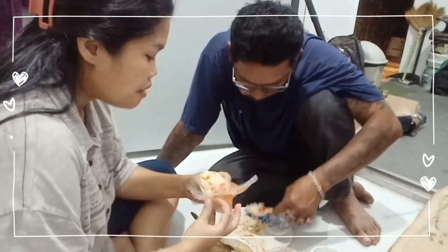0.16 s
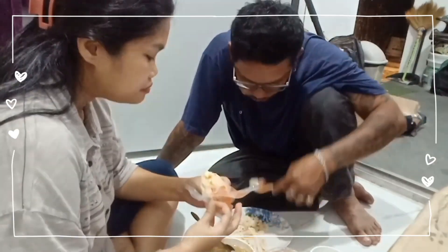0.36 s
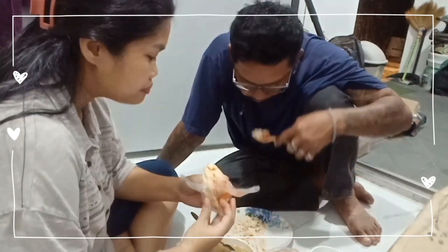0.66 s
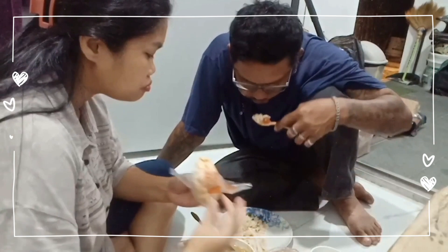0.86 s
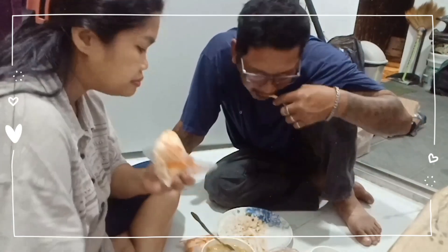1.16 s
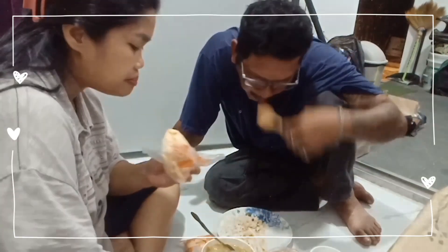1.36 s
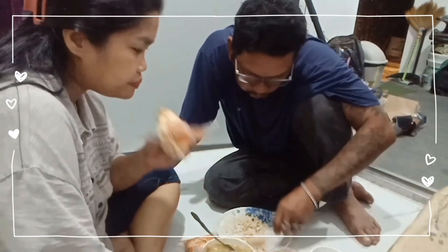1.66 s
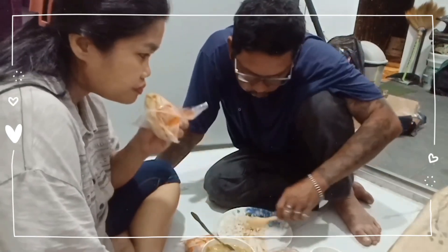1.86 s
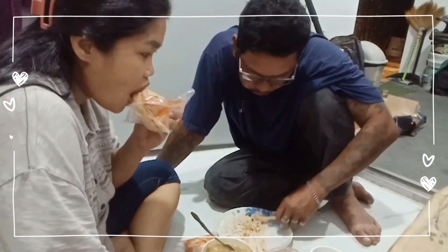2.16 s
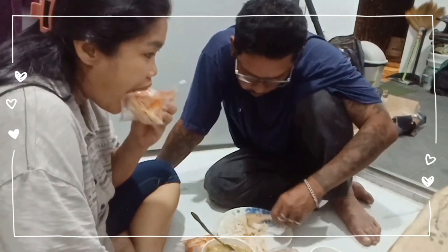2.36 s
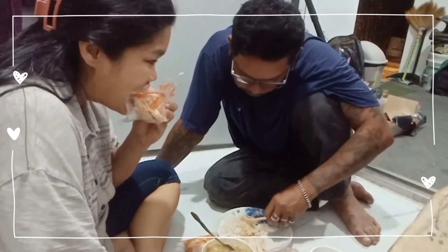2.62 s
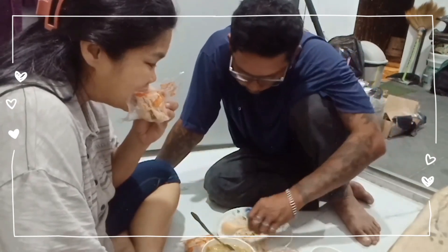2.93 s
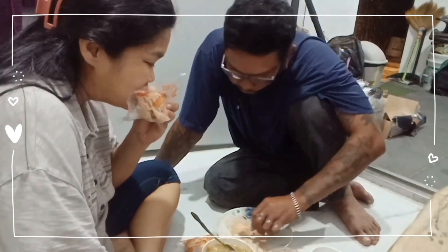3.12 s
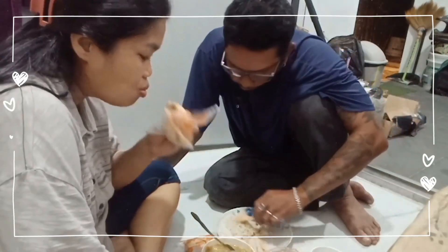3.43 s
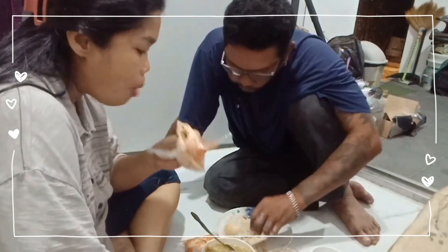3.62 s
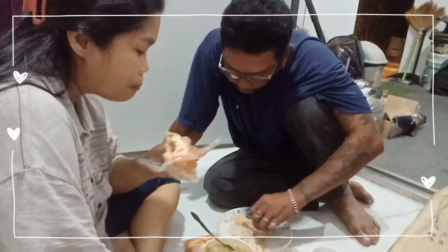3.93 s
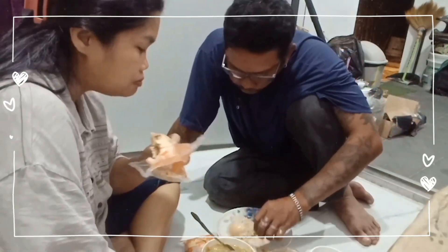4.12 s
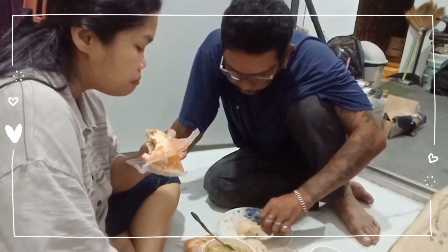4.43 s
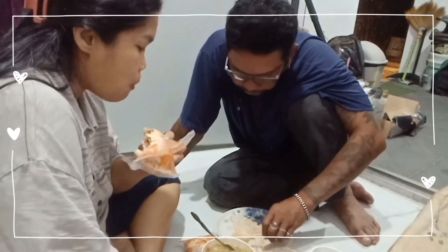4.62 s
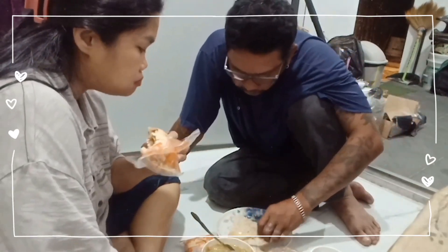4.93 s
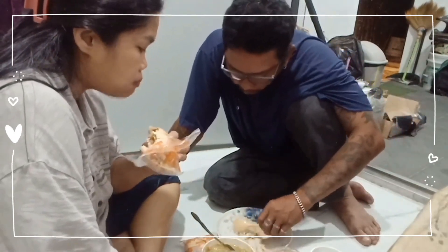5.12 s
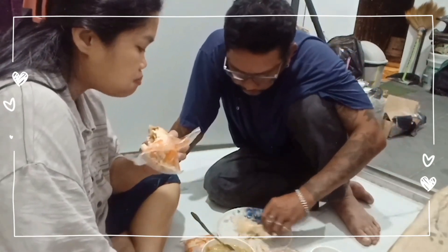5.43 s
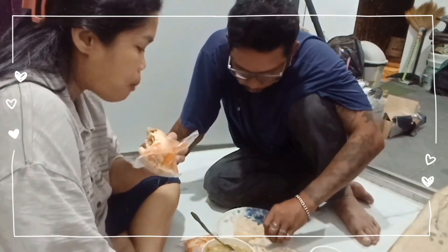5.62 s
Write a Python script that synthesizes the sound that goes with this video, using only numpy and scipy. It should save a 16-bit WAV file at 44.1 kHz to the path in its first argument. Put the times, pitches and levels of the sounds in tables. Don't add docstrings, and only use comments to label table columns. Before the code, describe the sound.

Paper wrapping crackles in the hands, then a metal spoon clinks, scrapes and briefly squeaks on a ceramic plate in a small hard room.

```python
import sys
import numpy as np
from scipy import signal
from scipy.fft import rfft, irfft
from scipy.io import wavfile
from scipy.ndimage import uniform_filter1d

SR = 44100
rng = np.random.default_rng(int(sys.argv[2]) if len(sys.argv) > 2 else 0)


def gain_from_db(level_db):
    decades = np.asarray(level_db, float) / 20
    return 10 ** decades


def master_out(mix):
    frames = np.transpose(np.atleast_2d(mix))
    ceiling = np.clip(frames, -1, 1)
    pcm = np.round(ceiling * 32767).astype(np.int16)
    wavfile.write(sys.argv[1], SR, pcm)


N = 254898
T = np.arange(N) / SR


def taps(tracks):
    # start_s, peak_db, knock_db, bright_db, room_db
    blows = [(1.8087, -34.5, 7, -23, -15), (1.8137, -35, -16, -23, -18), (2.2766, -42, -21, -7, 1),
             (2.293, -19.5, -10, -0.5, -4.5), (2.3153, -35.5, -9, -36, -2), (2.678, -21, -6, 2, -9),
             (2.688, -30.5, -13, -12, -25), (2.7296, -31, -10, -12, 1), (2.7472, -35, -11, 13, 0),
             (3.8731, -37, -3, -27, 0), (3.8836, -41, 11, -40, -6), (4.3193, -40, -25, -19, -0.5),
             (4.4087, -29, -17, -11.5, -14), (4.847, -11.5, -3, -7, -4), (4.8585, -24, -2, -12, -1.5),
             (4.87, -25, -11, -32, -4), (4.8802, -29, -9, -25, -2), (5.1237, -28.5, -13, -15, -14),
             (5.1255, -17, -16, -25, -9.5), (5.136, -24, 1, -34.5, -10.5)]
    bounce = [
        (5.5012, -15, -11, -8.5, -8),
        (5.5027, -7.5, -14, -15.5, -8),
        (5.5043, -6, -19, -27, -10),
    ]
    # [(pitch_hz, width_hz, level_db)]
    struck = [
        (0, [(802, 74, -14), (1380, 42, 0), (1810, 29, -6), (3160, 26, -8), (3220, 15, -7), (4680, 31, -19), (5400, 40, -16), (5490, 15, -31)]),
        (2.2, [(1560, 160, -13), (2280, 22, -6), (2730, 26, -11), (3150, 37, 7), (3800, 170, -4), (4640, 130, 1), (5240, 170, -1), (6200, 64, -2), (7800, 30, -14), (8800, 26, -11), (8750, 18, 0), (9300, 38, -19)]),
        (2.6, [(1150, 43, -9), (1710, 42, -7), (1960, 45, 0), (2280, 38, 2), (3320, 26, -21), (3940, 61, -7), (4470, 54, 7), (6060, 40, 2), (7900, 77, -22), (8300, 25, -11), (8550, 65, -9), (9200, 100, -21)]),
        (2.72, [(1380, 23, -6), (1970, 43, -9), (2660, 89, 0), (2980, 31, -4), (3400, 110, -21), (3820, 27, 4), (4300, 260, 8), (5100, 22, -1), (6200, 63, -17), (8500, 47, -4), (8680, 53, -11), (9420, 290, -15)]),
        (3.8, [(1217, 31, -2), (1400, 57, 3.5), (1920, 27, 3), (2690, 57, -3), (2900, 31, -15), (3480, 59, -2), (4590, 60, -28)]),
        (4.3, [(2410, 130, 2), (4670, 170, -7)]),
    ]
    struck_later = [
        (4.39, [(2350, 26, -10), (2660, 31, 0), (3180, 50, -2), (3920, 23, 5), (4330, 42, 7), (4620, 28, 11), (5100, 74, -13), (5800, 130, -20), (7970, 42, -19)]),
        (4.8, [(1208, 26, -1.5), (1440, 15, 6), (1870, 82, 1), (2460, 32, 0), (2715, 37, -4), (2840, 22, 1.5), (3030, 34, -8), (3830, 38, -17), (4100, 46, -7), (4700, 53, -17), (5130, 81, -7), (6070, 22, -13), (7900, 150, -18), (8090, 39, -19)]),
        (5.1, [(1060, 57, -13), (1660, 27, -4.5), (2496, 53, 2), (2790, 85, 1), (3340, 41, -11), (3760, 27, 0), (3890, 37, -0.5), (4300, 16, -18), (4720, 82, -16), (5160, 19, -12), (6000, 21, -21), (6900, 35, -14), (8350, 120, -17), (8900, 25, -20)]),
        (5.4, [(1390, 62, -12), (1655, 32, -0.5), (2024, 68, -3), (2410, 30, 2), (2920, 220, 4.5), (3420, 65, -22), (3740, 33, -11), (4200, 18, -14), (4200, 67, -14), (4600, 41, -8), (5100, 28, -24), (6350, 85, -25.5), (7300, 71, -21), (8060, 98, -22)]),
    ]
    for s, db, knock_db, bright_db, room_db in blows + bounce:
        blow = contact(T[:4096], 0.00045, 0.2, 0.0034)
        body = [table for start, table in struck + struck_later if start <= s][-1]
        crack = level(ring(ring(blow, 3290, 3200), 2700, 3500), -0.97)
        knock = level(ring(ring(blow, 1670, 1400), 730, 1600), knock_db + 0.5)
        tick = level(ring(ring(blow, 8930, 2300), 9000, 6200), bright_db + 1.5)
        sound = crack + knock + tick + level(modes(blow, body, 1.63), 1.9)
        add(tracks, s, to_peak(sound, db), room_db)


def spoon_ring(squeaked, struck):
    # pitch_hz, width_hz, level_db
    spoon = [(1335, 45, -10), (2620, 45, -9.5), (2890, 70, -4), (2690, 56, -13.5), (2760, 8, 2),
             (3870, 13, -0.5), (5290, 28, -13.5), (8370, 23, -7)]
    return gain_from_db(-3.0) * modes(squeaked, spoon, 0.55) + gain_from_db(15.0) * modes(struck, spoon[6:], 0.92)


def squeaks(tracks):
    # start_s, hold_s, slip_rate_hz, glide_hz_per_s, level_db
    slips = [
        (3.2482, 0.021, 1289, 5000.5, -20),
        (3.297, 0.013, 1344, -500, -24),
        (4.4967, 0.01, 1277, 1498, -43),
        (4.5117, 0.002, 1330, 502, -21.5),
        (5.177, 0.007, 1400, -2000, -39),
        (5.193, 0.008, 1335, 1000, -37.5),
    ]
    # first_multiple_db, fall_per_multiple_db, odd_multiples_db, rasp_db, room_db
    angles = [(-14, 5, -7.5, -13.5, -7), (-25, 17, -18, -21, -18), (6, 9.5, 12, -14, -0.5),
              (-5.5, 15, -4.5, -18, -8.5), (0, 16, -12, -6, -5), (-5.5, 15, -4.5, -8, -9)]
    rise_s, fall_s, edge_db = 0.0062, 0.0021, -13.5
    octave_db, rough_db = -0.5, 2.5
    for (s, hold, hz, glide, db), (first_db, fall_db, odd_db, rasp_db, room_db) in zip(slips, angles):
        knots = np.cumsum([0, rise_s, abs(hold), fall_s])
        t = np.arange(0, knots[-1], 1 / SR)
        noise = rng.standard_normal((2, 8192))[:, :len(t)]
        wobble = 1 + 0.069 * uniform_filter1d(noise[0], 40)
        phase = 2 * np.pi * np.cumsum((hz + glide * t) * wobble) / SR
        ease_db = np.interp(t, knots, [edge_db, 0, 0, edge_db])
        k = np.arange(1, 9)
        multiples_db = np.where(k == 1, first_db, octave_db - fall_db * (k - 2) + odd_db * (k % 2))
        flutter = uniform_filter1d(rng.standard_normal((8, 8192)), 30)[:, :len(t)] * 3.1 * rough_db
        tones = []
        for j, tone_db in zip(k, multiples_db):
            tones.append(gain_from_db(tone_db + (j != 2) * flutter[j - 1]) * np.sin(j * phase))
        tones[1] = tones[1] * gain_from_db(0.45 * ease_db)
        puffs = noise[1] * (1 + np.cos(phase))
        rasp = level(ring(ring(puffs, 3800, 3200), 4100, 4600), rasp_db)
        add(tracks, s, (1.65 * sum(tones) + rasp) * gain_from_db(db + ease_db), room_db)


def scrapes():
    # firmest_s, swell_s, ease_s, level_db, bright_db
    drags = [
        (3.242, 0.042, .003, -43.5, -7),
        (3.995, 0.038, 0.12, -51.5, -3),
        (4.06, 0.17, 0.046, -51.5, -8),
        (4.326, 0.0039, 0.054, -53.5, -27),
        (4.42, .005, 0.093, -46, -12),
        (4.49, 0.059, .003, -47, -10),
        (4.525, 0.033, 0.086, -39.5, -32),
        (4.846, 0.0069, .005, -38, -5),
        (5.151, .004, 0.088, -53, 2),
        (5.215, 0.098, 0.11, -35, -18),
    ]
    slides = [
        (1.89, 0.15, 0.099, -48, -9),
    ]
    # pitch_hz, width_hz, level_db
    middle = [(2646, 51, -7.5), (3300, 96, -4), (3787, 24, 1.5), (3990, 120, -5), (4580, 68, -4),
              (5390, 33.6, -2.5), (5900, 300, -31), (7340, 100, -14.5), (7950, 37, -22)]
    rim = [(2790, 20, -2), (3150, 77, -9), (4280, 83, -11), (6140, 84, -15), (8000, 75, -20)]
    grit = grains(5000, 3.6)
    drag = friction(drags, grit, lambda x: plate(x, middle), 2.7)
    slide = friction(slides, grit, lambda x: plate(x, rim), 4.2)
    return drag + slide + catches(grit)


def plate(x, table):
    return level(modes(x, table, 2.0), 0) + level(ring(x, 2400, 2700), -3.0)


def catches(grit):
    # firmest_s, swell_s, ease_s, level_db, pitch_hz
    notes_sung = [
        (1.6, 0.052, 0.044, -59, 4190),
        (2.525, 0.0091, 0.022, -43, 1550),
        (3.208, 0.0084, .055, -47, 3840),
        (4.377, 0.0092, 0.021, -42.5, 1610),
        (4.472, .017, .03, -51, 4700),
    ]
    total = 0
    for *stroke, hz in notes_sung:
        tone = level(ring(ring(grit, hz, 150), hz, 260), 0)
        total = total + tone * strokes([(*stroke, -40)])[0]
    return total


def creases(tracks):
    # start_s, peak_db, ring_hz, thin_db
    folds = [(0.077, -42, 5340, -8), (0.184, -47, 3820, -7), (0.2039, -38.5, 3990, -7.5),
             (0.388, -37.5, 5740, 5), (0.407, -30.5, 4000, -1), (0.454, -40, 3470, 9),
             (0.4794, -35, 5330, 12), (0.601, -37, 5340, -11), (0.613, -42.5, 3320, -20),
             (0.7045, -41.5, 3460, -18), (0.7395, -38, 3720, -4), (0.7946, -46, 5560, -19),
             (0.809, -38.5, 4240, -18), (0.84, -38, 4120, -10), (0.863, -36.5, 4000, 9),
             (0.9424, -43.5, 2550, -21), (1.011, -43, 4450, -14), (1.0234, -40, 4940, -3),
             (1.07, -47.5, 3980, -16), (1.132, -38, 3930, -27), (1.152, -41, 3300, -19),
             (1.158, -39, 4360, -22), (1.171, -52, 3360, 6), (1.453, -43.5, 3870, -13),
             (1.4673, -38, 5290, -31), (1.4832, -37, 3660, -4.5),
             (2.672, -43, 4600, -12), (2.8428, -26, 3130, -13.5), (2.8565, -43, 3300, -10),
                (2.8606, -30, 6000, 4), (2.864, -18.5, 5570, -4), (2.886, -38, 3100, -24),
                (2.9438, -35, 2900, -7), (2.972, -34, 2950, -11), (2.997, -42.5, 3550, -28),
                (3.0348, -42.5, 3460, 6), (3.118, -45, 4540, 6), (3.1254, -36, 4230, -11.5),
                (3.2052, -37, 4200, -13.5), (3.4163, -31, 4050, -12.5), (3.505, -52, 3335, -4),
                (3.6602, -44, 3540, -8.5), (4.4698, -35.5, 4580, -6), (4.6154, -48, 2920, -4)]
    for s, db, hz, thin_db in folds:
        thin_hz = 8940 * (1 + 0.066 * rng.standard_normal())
        snap = contact(T[:2048], 0.00057, 0.31, 0.0034)
        low = level(ring(ring(snap, hz, hz / 6), hz, hz / 1.6), 1.3)
        broad = level(ring(ring(snap, 1.34 * hz, hz), 1.15 * hz, 0.73 * hz), -5.0 + 0.41 * (thin_db + 2.5))
        thin = level(ring(ring(snap, thin_hz, thin_hz / 7), thin_hz, thin_hz / 0.76), thin_db - 2.5)
        air = level(ring(ring(snap, 9700, 7000), 7700, 9000), thin_db + 12.0)
        room_db = -4 - 0.5 * (db + 42.5)
        add(tracks, s, to_peak(low + broad + thin + air, db), room_db)


def rustle():
    # firmest_s, swell_s, ease_s, level_db, bright_db
    rubs = [
        (0.98, 3.0, 0.37, -66, -26),
        (.41, 0.035, 0.11, -60, -7),
        (.62, .03, 0.05, -66, -13),
        (.73, 0.054, 0.063, -59, -15),
        (.83, 0.054, 0.048, -53, -17),
        (1.16, 0.085, 0.053, -46.5, -32),
        (1.485, 0.069, 0.063, -49.5, -7),
        (2.92, 2.7, .53, -61.5, -16),
        (3.44, 0.022, 0.38, -62.5, -28),
        (3.79, 0.35, 0.023, -69, 0),
    ]
    return friction(rubs, grains(2200, 2.6), lambda x: ring(x, 4000, 4990), 4.0)


def bumps():
    # start_s, peak_db, pitch_hz
    pushes = [
        (1.489, -45.5, 616),
        (1.718, -46.5, 326),
        (2.31, -51, 532),
        (2.44, -54, 293),
        (2.715, -49.5, 242),
        (3.251, -50.5, 270),
        (4.787, -52, 320),
        (5.209, -52.5, 602),
        (5.622, -48.5, 302),
    ]
    out, t = np.zeros((2, N)), T[:8192]
    for s, db, hz in pushes:
        push = rng.standard_normal(len(t)) * t * np.exp(-t / 0.013)
        sound = ring(ring(push, hz, 56), hz, 65)
        add(out, s - 0.01, to_peak(sound, db - 0.5), 0)
    return out[0]


def room(x):
    # delay_s, level_db
    echoes = [
        (.0045, -25.5),
        (0.0105, -8.5),
        (0.02, -28),
        (.031, -12),
    ]
    # band_hz, t60_s
    fades = [(1000, 0.19), (3000, 0.2), (5500, 0.096), (8600, 0.17), (12000, 0.25)]
    t = T[:16384]
    tail = 0
    for hz, t60 in fades:
        band = level(ring(rng.standard_normal(len(t)), hz, 0.69 * hz), 0)
        tail = tail + band * gain_from_db(-60 * t / t60 + 8.6 * walk(104.0)[:len(t)])
    tail = 0.023 * tail * np.clip(t / 0.0055, 0, 1) ** 2
    spectrum = rfft(tail, 2 * len(t))
    power = np.abs(spectrum) ** 2
    even = np.sqrt(uniform_filter1d(power, size=900) / uniform_filter1d(power, size=60))
    tail = irfft(spectrum * even)[:len(t)]
    for s, db in echoes:
        tail[int(s * SR)] += gain_from_db(db)
    return signal.fftconvolve(x, tail)[:N]


def microphone(x):
    # pitch_hz, level_db
    response = [(300, -14), (950, -8.5), (1400, 3), (6000, -2.5), (7200, -4.5), (8300, 1), (9400, -10.5),
                (10200, -22), (11500, -15.5), (12600, -29), (13700, -19.5), (15000, -27.5), (15700, -53)]
    return colour(x, response)


def fan():
    # pitch_hz, level_db_per_hz
    rush_colour = [(82, -12), (140, -3), (172, -4), (307, 2.5), (410, -1.5), (543, 2), (750, -13.5),
                   (980, -5), (1650, -120)]
    air_colour = [(380, -23), (650, -6), (723, -10), (1440, -10.5), (1710, -2), (2200, -17), (2760, -16),
                  (3650, -26), (4340, -23.5), (7470, -30.5), (9350, -28.5), (9800, -44), (15500, -52)]
    # pitch_hz, width_hz, level_db
    whine = [(1705, 5.8, -63.5), (1714, 45, -64.5), (1926, 200, -69.5)]
    whistles = [(3380, 46, -79), (4450, 120, -85), (6970, 150, -83), (8300, 290, -88.5),
                (11400, 390, -97.5), (13570, 600, -96)]
    rush_db = -61.5 - 2.05 * np.maximum(T - 3.5, 0) + 7.4 * walk(4.986)
    rush = level(colour(rng.standard_normal(N), rush_colour), 0.65) * gain_from_db(rush_db)
    hiss = level(colour(rng.standard_normal(N), air_colour), -59.5) * gain_from_db(0.74 * walk(5.7))
    return rush + hiss + narrow(whine, 1.0, 3.1) + narrow(whistles, 8.7, 14)


def street():
    # peak_s, level_db
    swells = [
        (.3, -70),
        (.9, -69.5),
        (1.6, -60.5),
        (2.38, -65.5),
        (3.25, -64.5),
        (3.7, -62.5),
        (3.97, -70),
        (4.501, -59.5),
        (5.1, -68.5),
    ]
    gain = gain_from_db(-65)
    for s, db in swells:
        gain = gain + gain_from_db(db) * np.exp(-((T - s) / 0.093) ** 2)
    return level(ring(ring(rng.standard_normal(N), 88.3, 33), 94, 70), 0) * gain


def contact(t, hard_s, chatter, chatter_s):
    push = 0.5 * np.exp(-t / hard_s) + chatter * np.exp(-t / chatter_s)
    grit = rng.standard_normal(len(t)) * (1 - np.exp(-t / hard_s)) * push
    return grit + 1.055 * (np.arange(len(t)) == int(hard_s * SR))


def friction(rows, grit, body, flicker_db):
    press, bright_press = strokes(rows)
    bright = level(ring(ring(grit, 7100, 3900), 9100, 4000), 0) * bright_press
    return gain_from_db(flicker_db * walk(71)) * (level(body(grit), 0) * press + bright)


def strokes(rows):
    edge_db = -33.5
    gain = np.zeros((2, N))
    for s, swell, ease, db, bright_db in rows:
        away = np.where(T < s, (s - T) / swell, (T - s) / ease)
        gain += gain_from_db(db + edge_db * away) * (away < 1) * np.array([[1], [gain_from_db(bright_db)]])
    return gain


def grains(rate, spread_db):
    hit, sign, size = rng.random((3, N))
    return (hit < rate / SR) * np.sign(sign - 0.5) * gain_from_db(-spread_db * np.log(1.01 - size))


def modes(x, table, damping):
    return sum((-1) ** k * gain_from_db(db) * ring(x, hz, damping * width) for k, (hz, width, db) in enumerate(table))


def narrow(lines, swing_db, rate):
    total = 0
    for hz, width, db in lines:
        band = ring(ring(rng.standard_normal(N), hz, width), hz, 2 * width)
        total = total + level(band, db) * gain_from_db(swing_db * walk(rate))
    return total


def ring(x, hz, width):
    return signal.lfilter(*signal.iirpeak(min(hz, 0.45 * SR), hz / width, fs=SR), x)


def colour(x, points):
    hz, db = np.transpose(points)
    log_hz = np.log(np.arange(len(x) // 2 + 1) * SR / len(x) + 1)
    return irfft(rfft(x) * gain_from_db(np.interp(log_hz, np.log(hz), db)), len(x))


def walk(rate):
    k = int(SR / rate)
    steps = np.repeat(rng.standard_normal(N // k + 1), k)
    return 0.5 * uniform_filter1d(uniform_filter1d(steps, k), k)[:N]


def level(x, db):
    return x * gain_from_db(db) / np.sqrt(np.mean(x ** 2))


def to_peak(x, db):
    return x * gain_from_db(db) / np.abs(x).max()


def add(tracks, s, sound, room_db):
    i = int(s * SR)
    sound = sound[:N - i]
    tracks[:, i:i + len(sound)] += sound * np.array([[1], [gain_from_db(room_db)]])


def scene():
    squeaked, struck, paper = np.zeros((3, 2, N))
    squeaks(squeaked)
    taps(struck)
    creases(paper)
    tracks = squeaked + struck + paper
    tracks[0] += spoon_ring(squeaked[0], struck[0])
    rubbing = gain_from_db(-2.0) * (scrapes() + rustle())
    tracks += rubbing * np.array([[1], [gain_from_db(-12.0)]])
    near = microphone(tracks[0] + room(tracks[1]))
    return (near + bumps() + fan() + street())[None]


def top_cut(x):
    return signal.sosfilt(signal.butter(12, 15680, fs=SR, output="sos"), x)


def record(dry):
    return top_cut(dry)


dry = scene()
out = record(dry)
master_out(out)
```